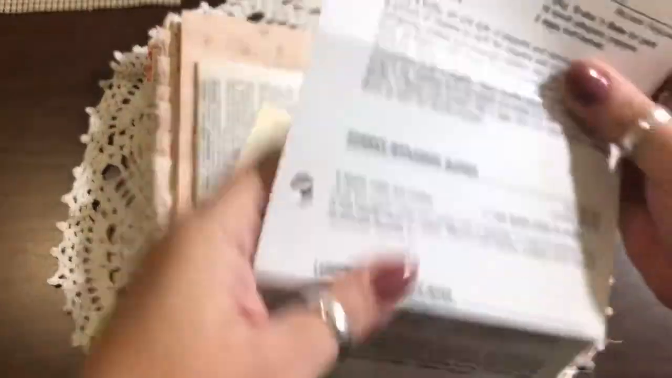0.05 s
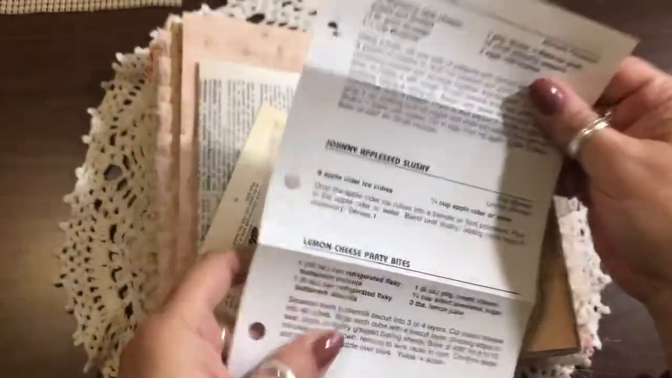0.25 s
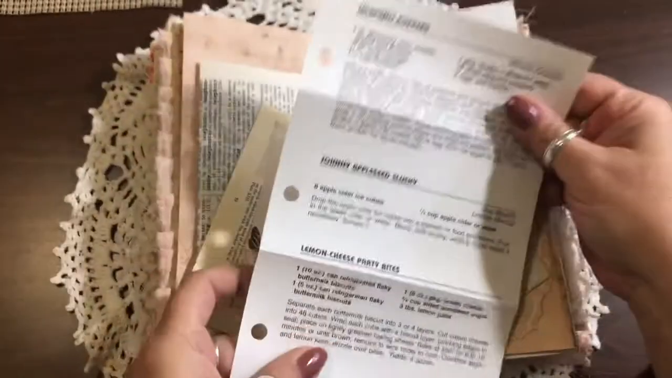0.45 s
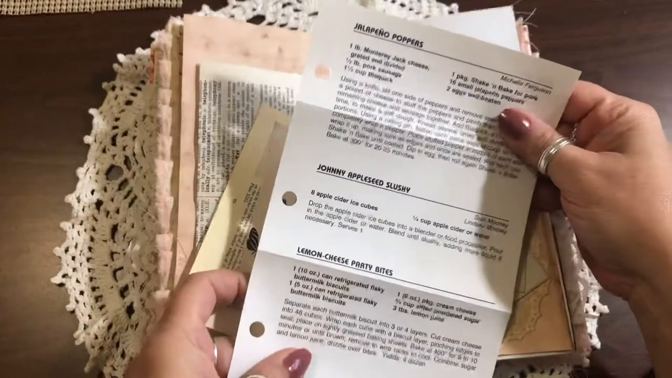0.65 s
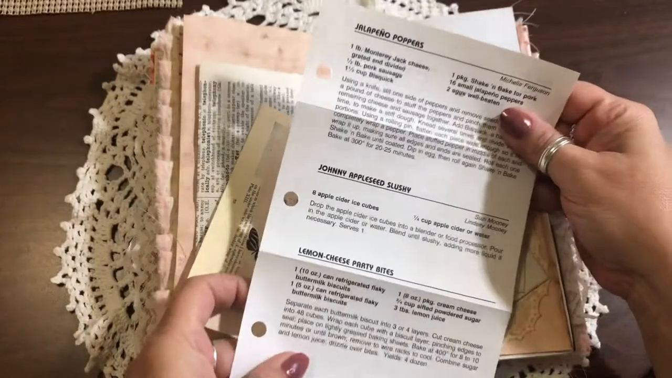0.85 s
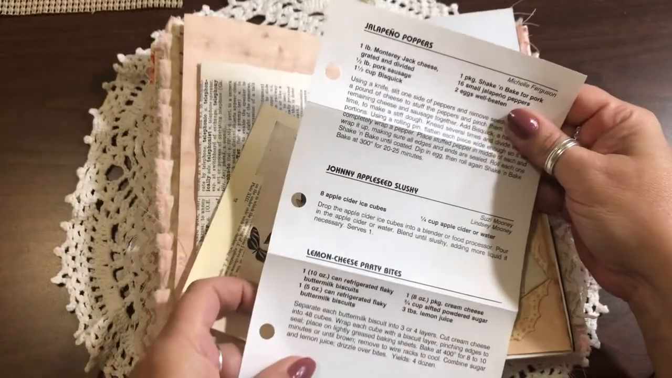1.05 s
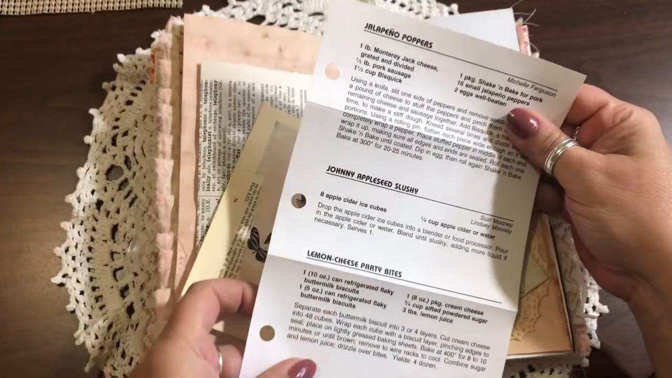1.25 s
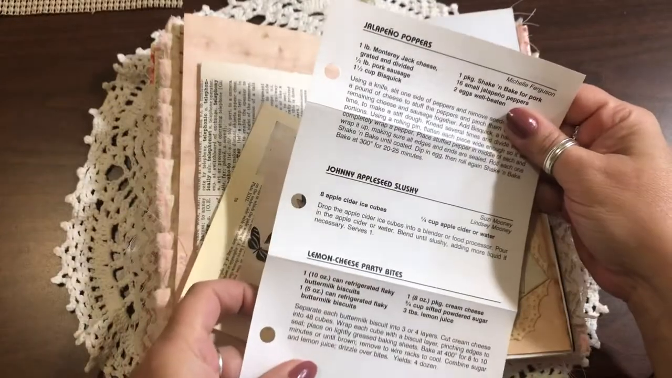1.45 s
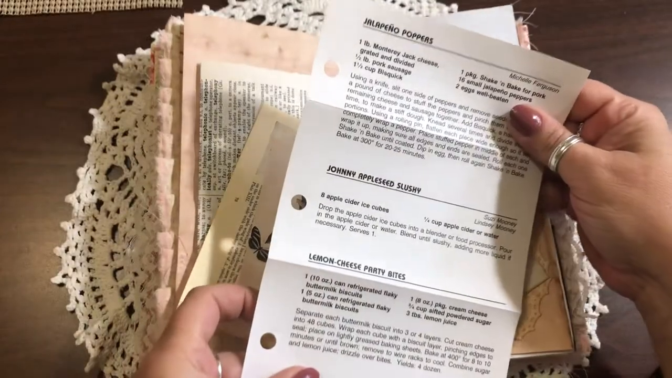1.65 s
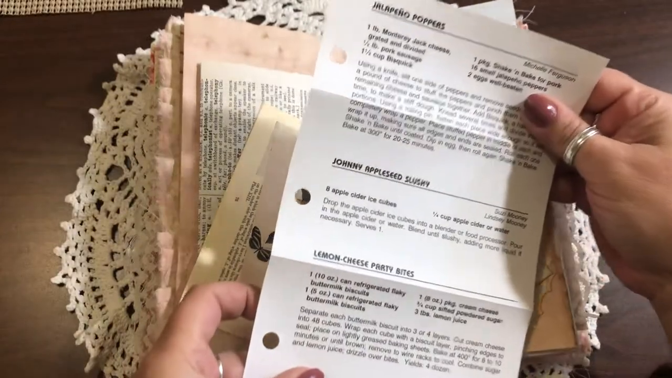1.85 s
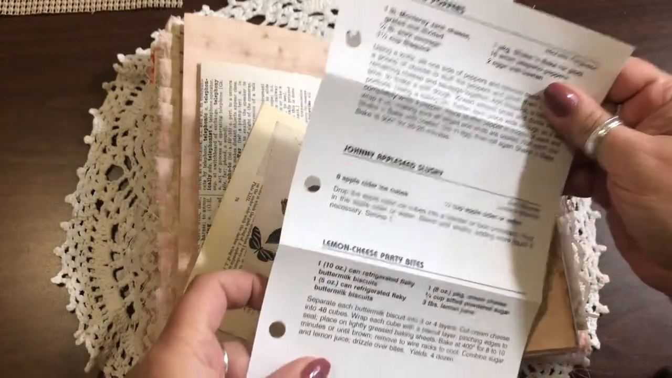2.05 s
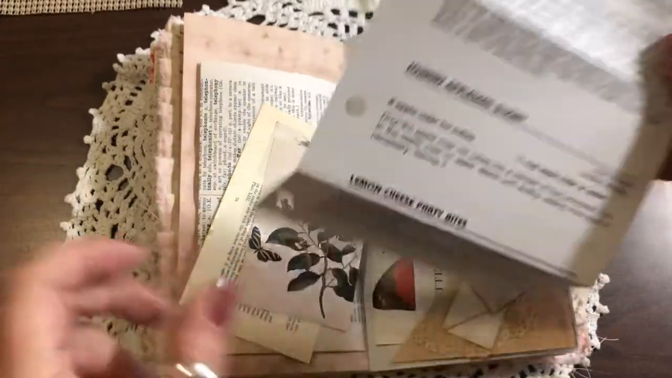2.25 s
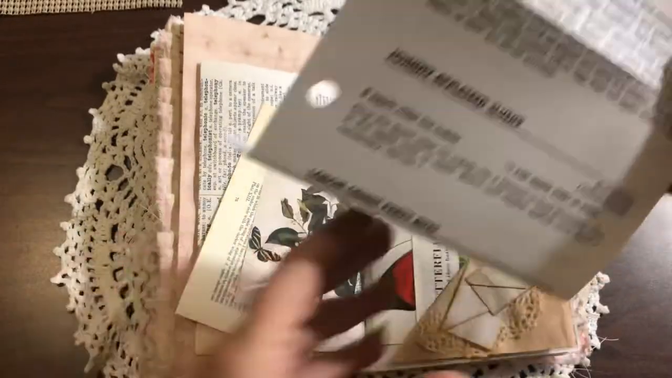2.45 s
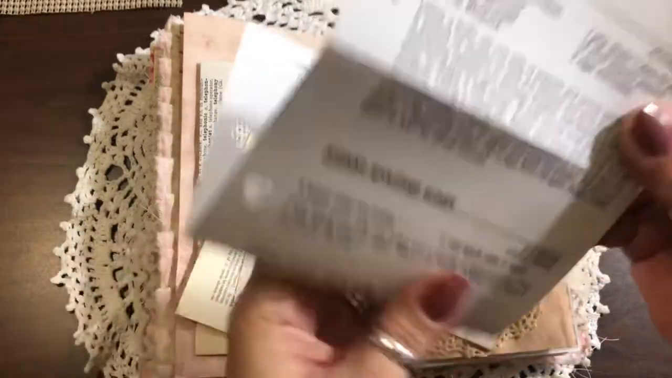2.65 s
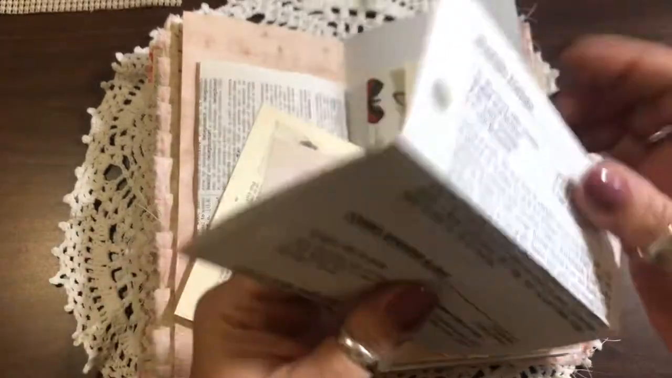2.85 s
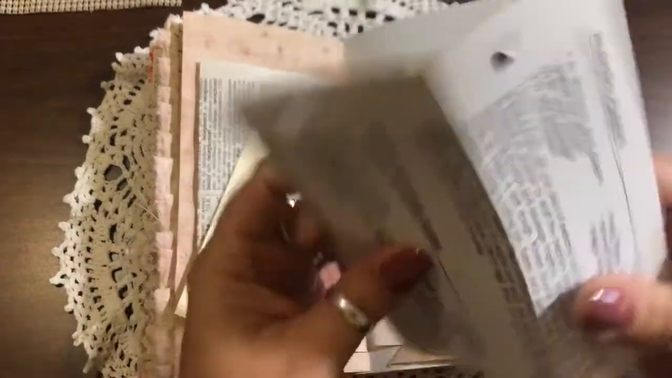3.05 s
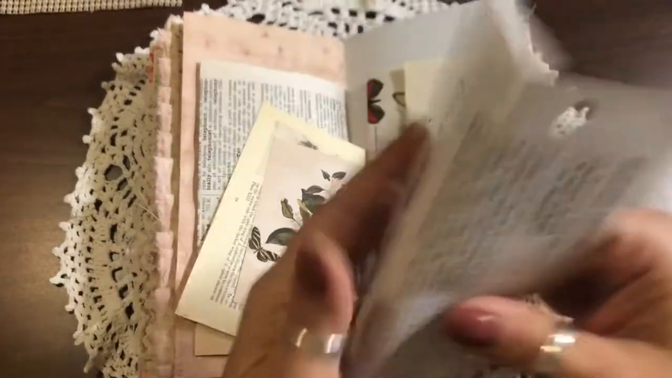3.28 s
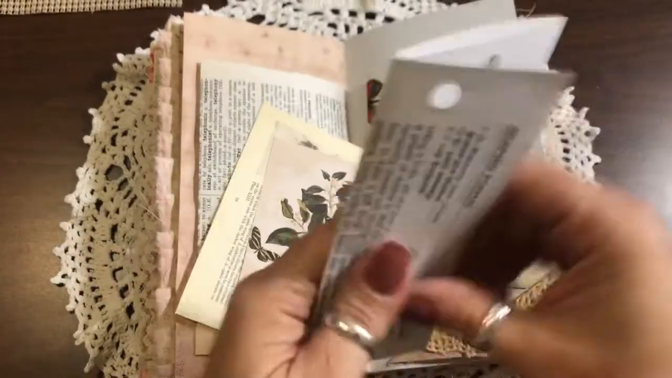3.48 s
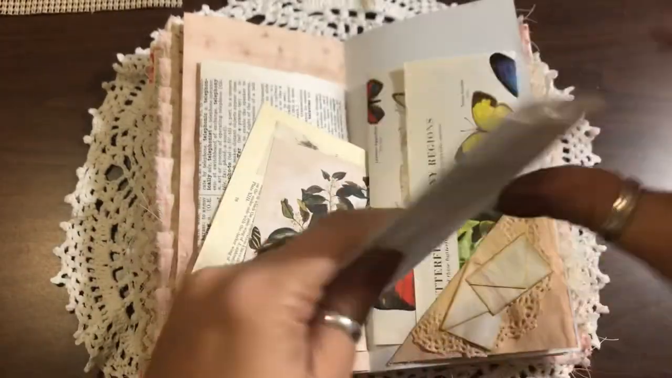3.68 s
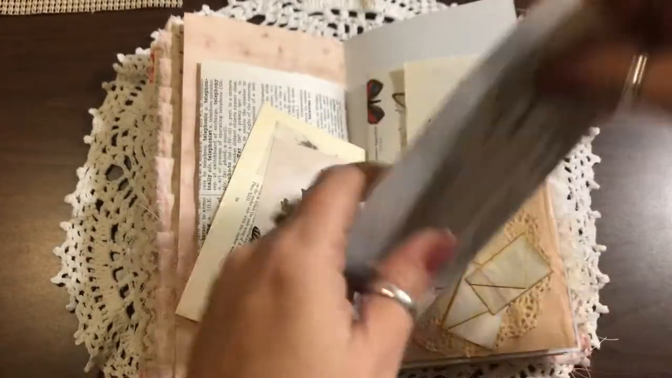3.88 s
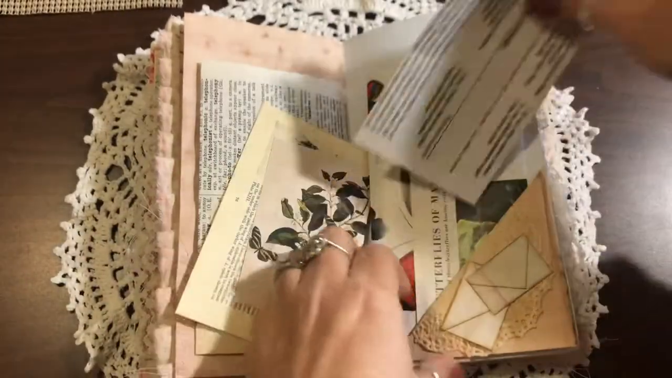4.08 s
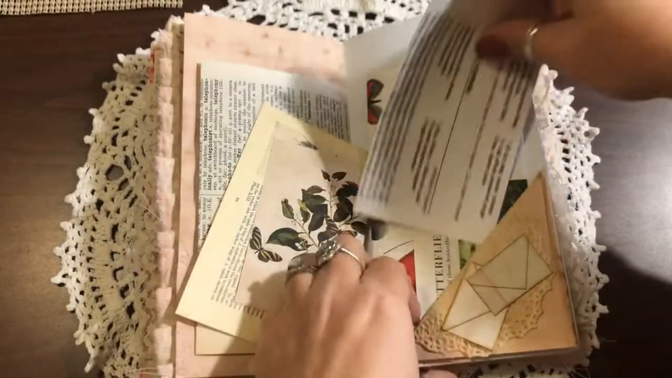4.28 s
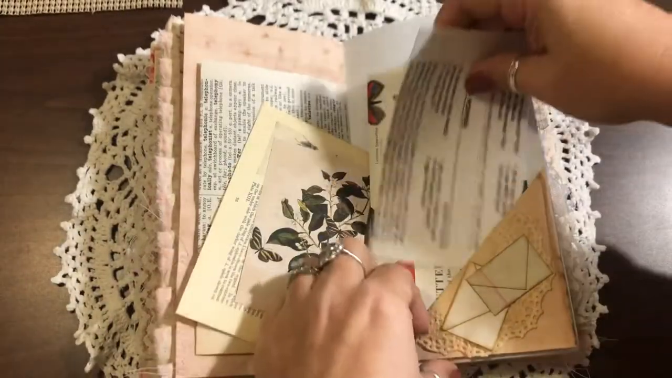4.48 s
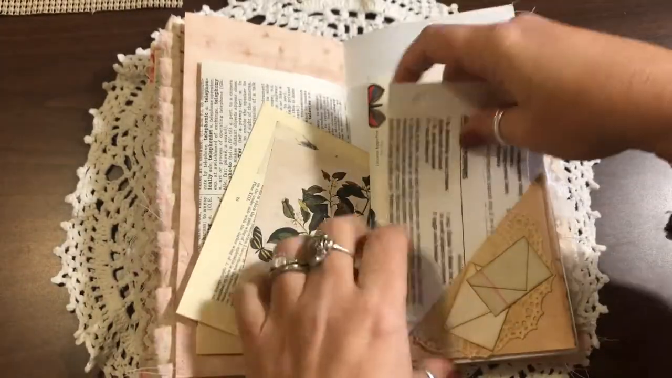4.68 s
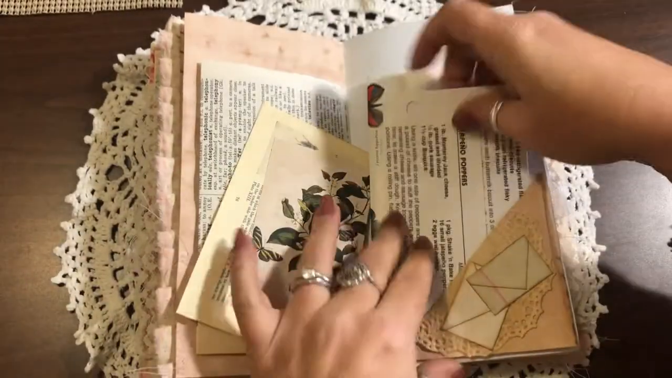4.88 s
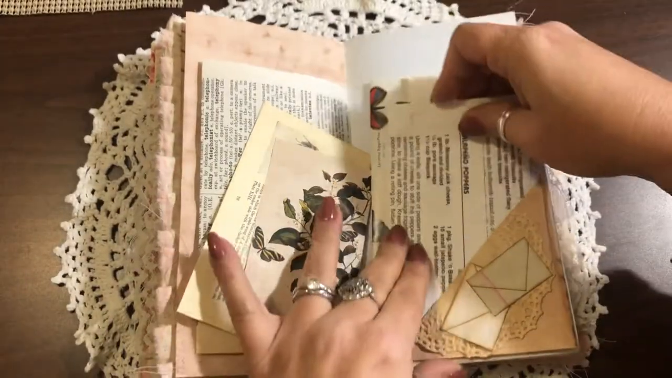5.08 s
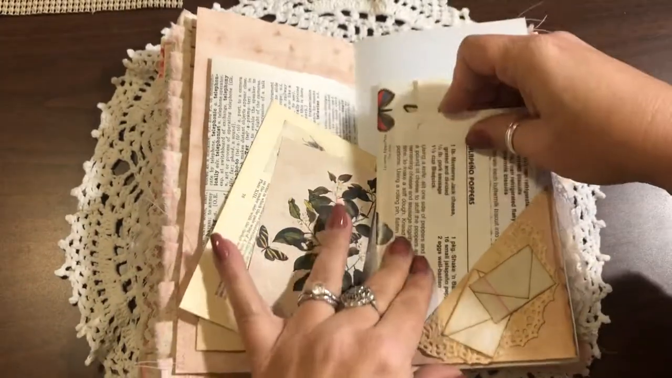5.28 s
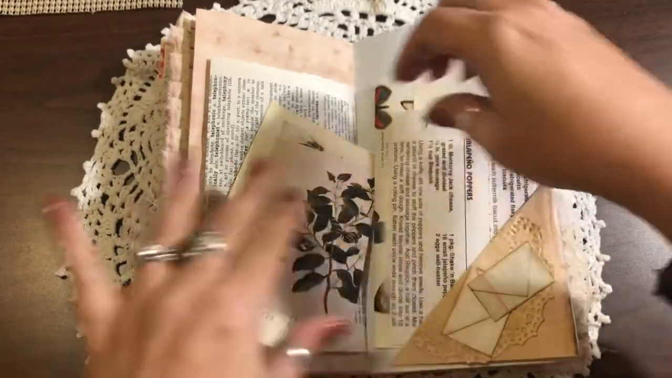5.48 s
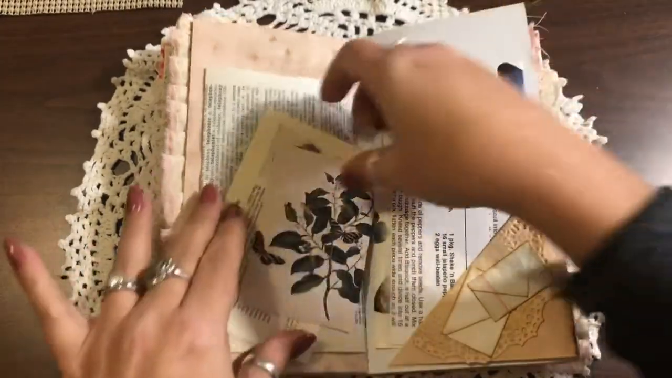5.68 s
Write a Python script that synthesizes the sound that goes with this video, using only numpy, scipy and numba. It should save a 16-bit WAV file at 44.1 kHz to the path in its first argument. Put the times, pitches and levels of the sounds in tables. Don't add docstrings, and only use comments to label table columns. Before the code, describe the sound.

Hands handle one creased sheet of stiff paper over an open handmade book. Quick rustle and hollow pops come first, then a near-silent hold with faint rubbing and tiny ticks. Brisk folding follows, with crackles and one very sharp crack, then softer sliding as the sheet is tucked into a page pocket. Close phone microphone, small quiet furnished room, faint low hum.

```python
import sys
import numpy as np
from scipy import signal
from scipy.fft import rfft, irfft
from scipy.io import wavfile
from scipy.ndimage import uniform_filter1d
from numba import njit

SR = 44100
rng = np.random.default_rng(int(sys.argv[2]) if len(sys.argv) > 2 else 0)


def natural_amplitude(level_db):
    exponent = np.asarray(level_db, float) / 20
    return 10 ** exponent


def put_to_file(sound):
    columns = np.atleast_2d(sound).T
    safe = np.clip(columns, -1, 1)
    whole_steps = np.round(safe * 32767)
    wavfile.write(sys.argv[1], SR, whole_steps.astype(np.int16))


N = 252384


def unit(x):
    return x / np.sqrt(np.mean(x ** 2))


def curves(table):
    s, *columns = np.transpose(table)
    return [np.interp(np.arange(N) / SR, s, column) for column in columns]


def band(x, lo_hz, hi_hz, order=2):
    return signal.sosfilt(signal.butter(order, [lo_hz, min(hi_hz, .45 * SR)], "band", fs=SR, output="sos"), x)


@njit
def moving_band(x, hz, sharp):
    y, mid, low = np.empty(len(x)), 0., 0.
    for i in range(len(x)):
        g = np.tan(np.pi * hz[i] / SR)
        v = (mid + g * (x[i] - low)) / (1 + g * (g + 1 / sharp))
        mid, low, y[i] = 2 * v - mid, low + 2 * g * v, v
    return y


def resonate(x, peaks):
    out = 0
    for k, (hz, width, db) in enumerate(peaks):
        out = out + (-1) ** k * natural_amplitude(db) * band(x, hz - width / 2, hz + width / 2, order=1)
    return out


def walk(rate):
    k = int(SR / rate)
    held = np.repeat(rng.standard_normal(N // k + 1), k)
    return 1.19 * uniform_filter1d(uniform_filter1d(held, k), k)[:N]


def slips(per_s, spread_db, count=1):
    happens = rng.random(N) < per_s / SR
    size = happens * natural_amplitude(spread_db * np.minimum(rng.exponential(size=N), 5))
    size = size / np.sqrt(uniform_filter1d(size ** 2, SR // 10))
    return size * rng.standard_normal((count, N))


def add(out, s, sound):
    i = max(int(s * SR), 0)
    out[i:i + len(sound)] += sound[:len(out) - i]


def burst(t, build_ms, fall_ms):
    return np.exp(np.where(t < 0, t / max(build_ms, .05), -t / max(fall_ms, .2)) * 1000)


def stroke(s, length, before):
    u = np.clip((np.arange(N) / SR - s) / length, 0, 1)
    skew = np.log(.5) / np.log(np.clip(before, .05, .95))
    roundness = 0.818
    return np.abs(np.sin(np.pi * u ** skew)) ** (2 * roundness)


def dying(s, fade_s):
    t = np.maximum(np.arange(N) / SR - s, 0)
    attack_s, longest_fade_s = 0.0021, .4
    return (1 - np.exp(-t / attack_s)) * natural_amplitude(-60 * t / min(fade_s, longest_fade_s)) ** 2


def blend(moves, held_db):
    power = natural_amplitude(held_db) ** 2 + sum(p * natural_amplitude(db) ** 2 for p, db, _ in moves)
    colour = sum(p * natural_amplitude(db) ** 2 * c for p, db, c in moves) / power
    return 10 * np.log10(power), colour


# (frequency [Hz], density [dB per Hz])
ROOM_TONE = [(15, -52), (25, -13.5), (70, -6.5), (130, -7), (600, -18), (1070, -16.5), (2800, -28),
             (16000, -34.5)]


def room_tone():
    tone_db, hum_hz, hum_db = -69.5, 120.1, -67
    hz, db = np.transpose(ROOM_TONE)
    bins = np.arange(1, N // 2 + 2) * SR / N
    air = irfft(rfft(rng.standard_normal(N)) * natural_amplitude(np.interp(np.log(bins), np.log(hz), db)), N)
    hum = np.sqrt(2) * np.sin(2 * np.pi * hum_hz * np.arange(N) / SR + 0.1 * walk(6.9))
    return unit(air) * natural_amplitude(tone_db + 1.8 * walk(2.5)) + hum * natural_amplitude(hum_db + 0.9 * walk(7.1))


# (start [s], length [s], level [dB], share of the stroke before its peak [0-1], brightness [dB])
STROKES = [(-.03, 0.0656, -50.5, 0.64, 2), (.02, 0.1022, -47.5, 0.26, 0.5), (0.096, 0.29, -54, 0.37, 4),
           (0.364, 0.1646, -62, 0.43, -3), (0.495, 0.208, -60.5, 0.087, -2.5),
           (0.63, 0.25, -71.5, 0.61, -3), (0.745, 0.2, -62.5, 0.38, -4), (0.894, 0.17, -71, 0.177, -8),
           (2.032, .08, -56.5, .55, 4.5), (2.106, 0.085, -44, 0.48, 0), (2.199, 0.043, -49, .2, 4),
           (2.49, .045, -61, .6, -2), (2.608, 0.2, -53.5, 0.47, 2), (2.853, 0.26, -66, 0.36, 6),
           (2.959, 0.073, -55, 0.33, -1), (3.02, 0.11, -50, 0.55, -0.5), (3.11, 0.14, -53, 0.12, -2),
           (3.3, .13, -55, .5, 1.5), (3.425, .135, -46.5, .7, 8), (3.528, 0.088, -63, .25, 8),
           (3.683, 0.079, -64.5, .4, 4), (3.731, 0.07, -56.5, 0.49, 5.5), (3.764, 0.2, -58.5, 0.55, 9.5),
           (3.922, 0.084, -56.5, 0.23, -4),
           (3.973, 0.24, -61.5, 0.49, -6), (4.054, 0.41, -54, 0.69, -5), (4.415, 0.17, -47.5, 0.47, 0),
           (4.5, 0.2, -45, 0.54, 0.5), (4.671, .12, -49.5, 0.44, 2.5), (4.775, 0.249, -58.5, 0.32, 3),
           (4.977, .11, -55, 0.35, -1.5), (5.095, 0.16, -57.5, 0.45, -6), (5.249, 0.0733, -52.5, 0.58, 0.5),
           (5.298, 0.058, -52.5, 0.53, 5), (5.6, .11, -68, 0.44, 1)]
# (time [s], level [dB], fade to -60 dB [s], brightness [dB])
SCUFFS = [(1.79, -72, 1, 6.5), (2.331, -72, .3, -15.5), (2.386, -74, .4, 3), (2.425, -47.5, 0.11, -29.5),
          (2.482, -54, .1, 0), (2.554, -59, .2, -2), (2.772, -45.5, 2, 3), (2.803, -47, 0.01, -0.5),
          (2.997, -41, 0.2, 1.5), (3.232, -48, 7, 1), (3.256, -43, 0.5, 1), (3.413, -44.5, 0.6, -8.5),
          (4.986, -57, .15, -5), (5.712, -59, .3, 2), (5.588, -64, .35, 3)]


def rubbing():
    moves = [(stroke(s, length, before), db, bright) for s, length, db, before, bright in STROKES]
    moves += [(dying(s, fade_s), db, bright) for s, db, fade_s, bright in SCUFFS]
    db, bright = blend(moves, held_db=-82.5)
    body_db = -4.5 - 0.61 * bright
    hiss_db = -2.5 + bright
    return db, body_db, hiss_db


# (start [s], length [s], resonance [Hz], strength [dB])
WHISTLES = [
    (.15, 0.34, 5780, 4),
    (.48, 0.54, 6220, -1),
    (2.72, 0.074, 3700, 2),
    (2.9, 0.12, 6890, 4),
    (3.7, 0.082, 4700, 0),
    (3.83, 0.13, 8400, 1),
    (3.93, .06, 5170, 8.5),
    (4.12, 0.25, 6700, -3),
]


def whistling():
    s, length, hz, _ = np.transpose(WHISTLES)
    moves = [(stroke(start, long_s, .5), level, 0) for start, long_s, _, level in WHISTLES]
    db, _ = blend(moves, held_db=-14.5)
    steady = np.ravel([s + .25 * length, s + .75 * length], "F")
    return np.interp(np.arange(N) / SR, steady, np.repeat(hz, 2)), db


# (time [s], judder of the grip [dB], ring of the page lying under it [dB])
GRIP = [
    (0, 1, -13),
    (2.0, 1.35, -11),
    (3.6, 2, -18.5),
    (4.0, 1.05, -5),
    (4.8, 0.8, -0.5),
    (5.0, 1.04, -0.5),
    (5.72, 3, -11),
]
# (frequency [Hz], width [Hz], level [dB])
PAGE = [(773, 61, -1.5), (1680, 240, 2), (3381, 420, 0), (4640, 360, -5.5)]


def slide():
    db, body_db, hiss_db = rubbing()
    gap_hz, gap_db = whistling()
    judder_db, page_db = curves(GRIP)
    rub = slips(per_s=14000, spread_db=0.79 * judder_db, count=5)
    rub = rub * natural_amplitude(judder_db * (1.41 * walk(45) + 0.88 * walk(170)))
    body = unit(band(rub[0], 1156, 2590)) * natural_amplitude(body_db + 2.0 * walk(30))
    middle = unit(band(rub[1], 2740, 7000)) * natural_amplitude(-0.5 + 1.4 * walk(27.94))
    gap = unit(moving_band(rub[2], gap_hz, 7.0)) * natural_amplitude(gap_db - 1.5)
    hiss = unit(band(rub[3], 6400, 17250)) * natural_amplitude(hiss_db + 1.6 * walk(32))
    page = unit(resonate(rub[4], PAGE)) * natural_amplitude(page_db)
    return natural_amplitude(db - 1.15) * (body + middle + gap + hiss + page)


# (start [s], length [s], level [dB], share of the bend before its peak [0-1], air push [dB])
BENDS = [(-.03, 0.18, -44.5, 0.15, -2.5), (0.244, 1, -68, 0.1, -12), (1.925, 0.176, -74, 0.66, -1),
         (2.047, 0.24, -52, 0.59, -17), (2.188, .13, -50, 0.19, -7), (2.442, 0.17, -49.5, 0.13, -4),
         (2.576, 0.19, -53.5, 0.65, -7), (2.761, 0.093, -43, 0.45, -16), (2.955, .1, -52, .6, -6),
         (3.01, .1, -41, .6, -11), (3.08, .15, -51, 0.353, -6), (3.227, 0.15, -47.5, 0.18, -4.5),
         (3.409, 0.2, -48.5, 0.17, -8), (3.717, 0.134, -59.5, 0.44, -6), (3.845, 0.18, -59.5, 0.63, -13),
         (4.09, 0.42, -68, 0.38, -17), (4.42, 0.41, -63, 0.48, -22), (4.95, 0.39, -63.5, 0.32, -20),
         (5.247, 0.14, -61, 0.62, -11), (5.549, 0.297, -68, 0.33, -7)]


def bending():
    moves = [(stroke(s, length, before), db, push) for s, length, db, before, push in BENDS]
    moves += [(dying(s, 2.22 * ring_s), db - 16, -21.5) for s, db, _, ring_s in POPS]
    db, push_db = blend(moves, held_db=-76.5)
    lag_s = 0.017
    step = 1 / (lag_s * SR)
    air = signal.lfilter([step], [1, step - 1], natural_amplitude(db + push_db) ** 2)
    return db, 10 * np.log10(air + 1e-14) - db


def flex():
    db, push_db = bending()
    buckles = slips(per_s=2500, spread_db=2.0, count=3) * natural_amplitude(1.05 * walk(40))
    broad = unit(band(buckles[0], 167, 448)) * natural_amplitude(-2.5 + 2.7 * walk(12))
    tight = unit(band(buckles[1], 488, 856)) * natural_amplitude(0.3 + 1.7 * walk(18))
    crisp = unit(band(buckles[2], 970, 1900, order=1)) * natural_amplitude(-10.5 + 2.7 * walk(30))
    push = unit(band(rng.standard_normal(N), 48, 190)) * natural_amplitude(push_db + 3.5 + 2.1 * walk(13.0))
    return natural_amplitude(db - 4.5) * (broad + tight + crisp + push)


# (time [s], peak [dB], centre [Hz], ring to -60 dB [s])
POPS = [(0.013, -27, 636, 0.11), (0.044, -35, 442, 0.053), (0.152, -30, 418, 0.1),
        (0.201, -27.5, 442, 0.06), (0.238, -29, 637, 0.082), (0.637, -50.5, 328, 0.05),
        (2.087, -39.5, 984, 0.061), (2.118, -39, 606, 0.092), (2.243, -28, 480, 0.08),
        (2.334, -41.5, 511, 0.085), (2.426, -29, 273, 0.088), (2.433, -25, 850, 0.054),
        (2.615, -41.5, 542, 0.054), (2.671, -43.5, 157, 0.16), (2.781, -31, 596, 0.047),
        (2.829, -38.5, 171, 0.192), (2.997, -32.5, 632, 0.065), (3.065, -25, 541, 0.055),
        (3.236, -36, 229, 0.07), (3.303, -31, 480, 0.06), (3.416, -28.5, 517, 0.075),
        (3.764, -33.5, 281, 0.0427), (4.039, -46, 413, 0.092), (4.203, -48, 856, 0.18),
        (4.763, -44.5, 630, 0.045), (4.948, -43, 847, 0.066), (4.986, -40, 620, 0.06),
        (5.193, -47, 640, 0.081), (5.295, -41.5, 770.7, 0.089), (5.354, -45, 230, 0.05)]


def pops():
    out, t = np.zeros(N), np.arange(7000) / SR
    for s, db, hz, ring_s in POPS:
        place, size = rng.random((2, 7, 1))
        mode_hz = hz * 2 ** (1.98 * (place - .45))
        fade = np.exp(-np.log(1000) * t * (mode_hz / hz) ** 0.13 / max(ring_s, .01))
        modes = (0.79 + size) * fade * np.sin(2 * np.pi * mode_hz * t)
        ring = modes.sum(axis=0) * (1 - np.exp(-t / 0.0013))
        add(out, s, ring / np.abs(ring).max() * natural_amplitude(db - 6.0))
    return out


# (time [s], peak [dB], centre [Hz], treble [dB])
CREASES = [(0.2012, -29, 1346, -20.5), (0.5053, -53, 1800, -8), (1.159, -60, 1310, -10),
           (1.3894, -71, 1430, 7), (1.5196, -61, 1310, -14.5), (2.089, -51, 1680, 2),
           (2.11, -38.5, 3850, -3), (2.1348, -38, 1460, -12), (2.2016, -33.5, 1700, -16.5),
           (2.4236, -29, 2380, -12), (2.435, -34.5, 1480, -32), (2.555, -46.5, 4170, -15.5),
           (2.6113, -44, 5700, -16), (2.6441, -41, 3390, -13.5), (2.6682, -33, 3530, -12),
           (2.6904, -36.5, 4070, -15), (2.7581, -27.5, 4140, -9), (2.8271, -28, 2005, -28),
           (2.9614, -45, 6890, -7.5), (2.998, -30.5, 1500, -23), (3.0656, -27.5, 1440, -18),
           (3.09, -41, 3330, -9), (3.152, -44, 3500, -8), (3.231, -34.5, 2940, -5), (3.259, -23, 3400, 0),
           (3.2833, -31, 6600, -20), (3.306, -36, 4300, -19), (3.4153, -25.5, 3970, -5),
           (3.5191, -29, 4910, -7.5), (3.763, -40.5, 4570, -5)]


def creases():
    out, t = np.zeros(N), np.arange(-200, 2400) / SR
    for s, db, hz, treble_db in CREASES:
        noise = rng.standard_normal(len(t))
        shape = burst(t, build_ms=0.22, fall_ms=4)
        snap = unit(band(noise, hz / 1.9, hz * 1.4, order=1)) * shape
        snap += unit(band(noise, 7000, 18000)) * shape ** 2 * natural_amplitude(treble_db)
        add(out, s + 0.0011 + t[0], snap * natural_amplitude(db - 7.0))
    return out


# (time [s], peak [dB], centre [Hz], spread [octaves], low tail [dB])
TICKS = [(0.2390, -33, 2000, .8, -8), (1.736, -55, 3970, 1.3, -30), (1.767, -32.5, 3930, 1.66, -27),
         (1.7832, -39, 6000, 1.3, -35.5), (2.2435, -45.5, 1300, 0.4, -7.5), (2.334, -56, 2500, 0.47, -6),
         (2.424, -36, 4970, 1, -7), (2.482, -39, 6000, 1, -13), (2.775, -27.5, 5500, 0.74, -26),
         (3.484, -34, 2800, .7, -14), (3.756, -41, 5500, .8, -23), (3.8646, -30.5, 3000, 0.82, -20.5),
         (4.041, -41, 2500, 1.2, -4), (4.082, -48, 8400, 0.38, -30.5), (4.7683, -35, 2620, 0.53, -13.5),
         (4.9467, -30.5, 2000, 0.68, -3.5), (5.0955, -41, 2960, 1.07, -22.5), (5.195, -51.5, 8000, .4, -30),
         (5.2985, -44, 1300, .9, -6), (5.33, -45, 1500, .6, -12), (5.355, -50, 900, 0.69, 4)]


def ticks():
    out, t = np.zeros(N), np.arange(1500) / SR
    falling_hz = 1800 / (1 + t / 0.0014) ** 1.2
    tail = np.sin(2 * np.pi * np.cumsum(falling_hz) / SR) * np.exp(-t / 0.0031)
    for s, db, hz, octaves, tail_db in TICKS:
        wide = 2 ** max(octaves, .2)
        fizz = natural_amplitude(-11.5) * rng.standard_normal(len(t)) * np.exp(-t / 0.0014)
        pulse = band(signal.unit_impulse(len(t)) + fizz, hz / wide, hz * wide)
        add(out, s, natural_amplitude(db) * (pulse / np.abs(pulse).max() + natural_amplitude(tail_db) * tail))
    return out


# (time [s], peak [dB], build-up [ms], fall [ms])
WHIP = (2.7975, -10.5, 1.6, 1.1)
# (frequency [Hz], width [Hz], level [dB])
RIDGE = [(2000, 110, -11), (3420, 290, 7.5), (4140, 190, -5), (6330, 650, 0.5), (7470, 240, -7),
         (11340, 250, -25)]


def whip():
    out, t = np.zeros(N), np.arange(-500, 2000) / SR
    s, db, build_ms, fall_ms = WHIP
    tear = rng.standard_normal(len(t)) * burst(t, build_ms, fall_ms)
    crack = unit(resonate(tear, RIDGE))
    crack += natural_amplitude(-1.0) * unit(band(tear, 1800, 7570))
    crack += natural_amplitude(-19.5) * unit(band(tear, 7000, 15800))
    add(out, s + t[0], crack / np.abs(crack).max() * natural_amplitude(db))
    return out


def room(x):
    t60_s, level_db = 0.2, -18
    t = np.arange(SR // 2) / SR
    noise = rng.standard_normal(len(t)) * (t > .004)
    dull = band(noise, 56, 3200, order=1) * natural_amplitude(-60 * t / t60_s)
    bright = band(noise, 2200, 21000, order=1) * natural_amplitude(-60 * t / (1.2 * t60_s))
    tail = dull + .5 * bright
    return signal.fftconvolve(x, tail / np.sqrt(np.sum(tail ** 2)))[:N] * natural_amplitude(level_db)


def scene():
    paper = slide() + flex() + pops() + creases() + ticks() + whip()
    return (paper + room(paper) + room_tone())[None]


def low_pass(x):
    return signal.sosfilt(signal.butter(12, 17020, fs=SR, output="sos"), x)


def record(dry):
    x = signal.sosfilt(signal.butter(2, 45, "high", fs=SR, output="sos"), dry)
    x = signal.sosfilt(signal.ellip(8, .2, 50, 15900, fs=SR, output="sos"), x)
    return low_pass(x)


dry = scene()
out = record(dry)
put_to_file(out)
```